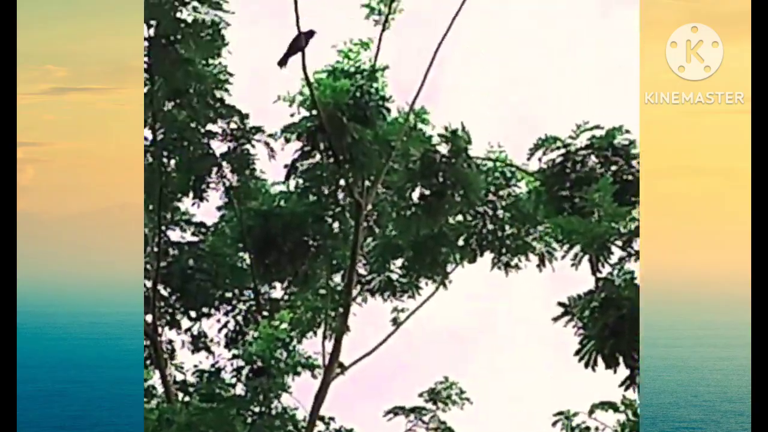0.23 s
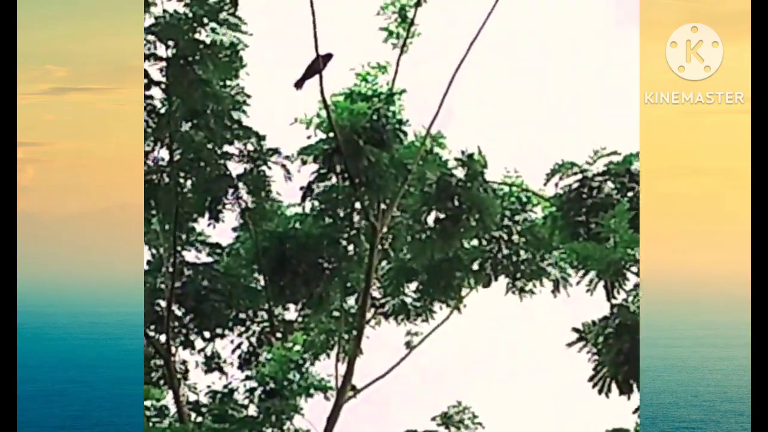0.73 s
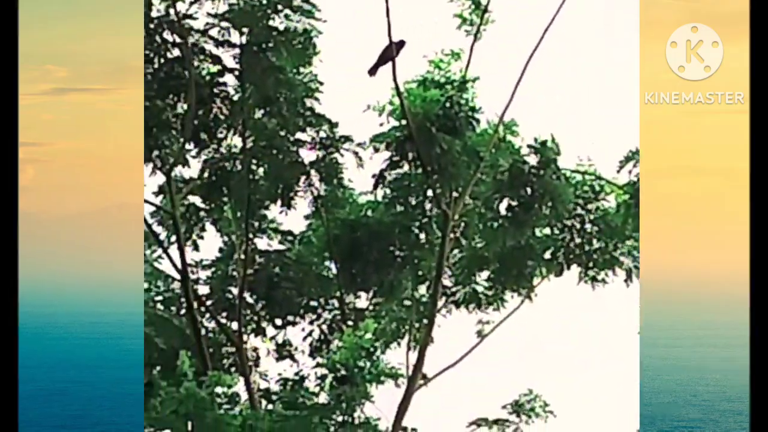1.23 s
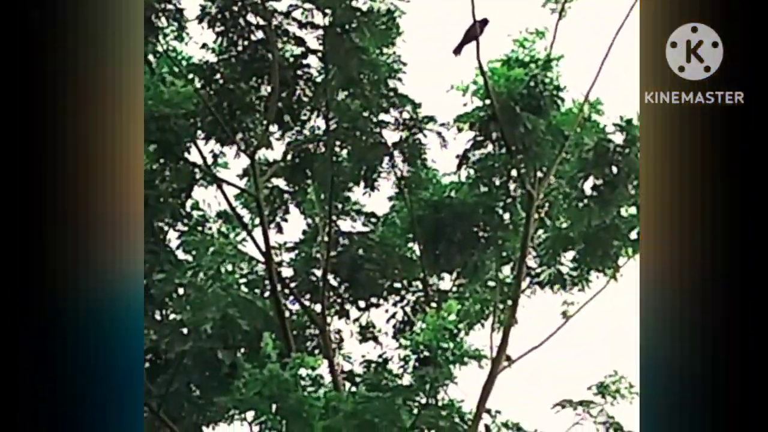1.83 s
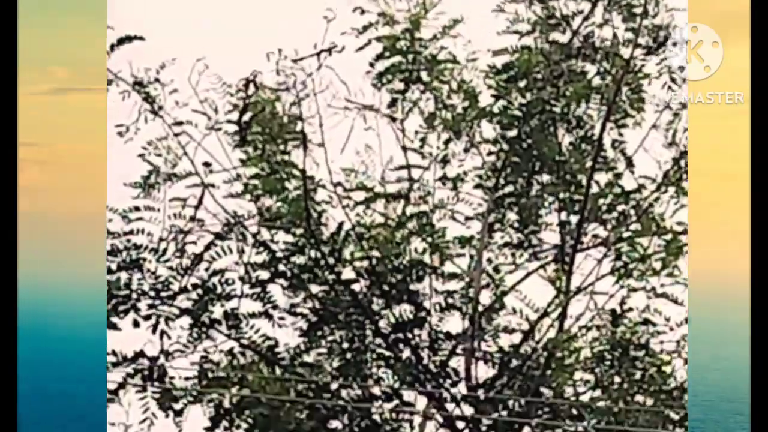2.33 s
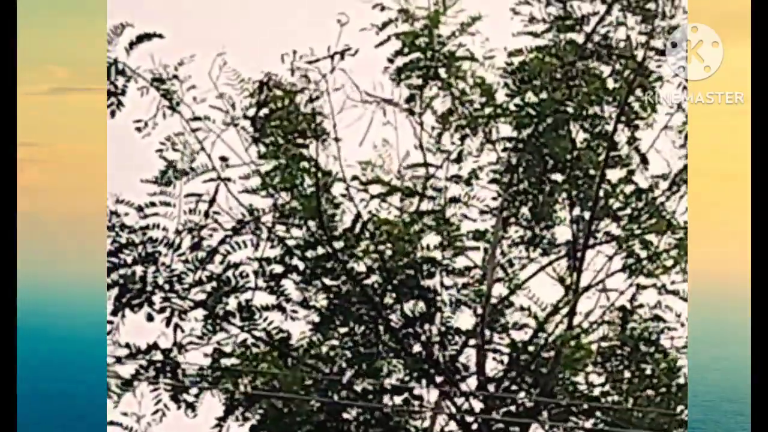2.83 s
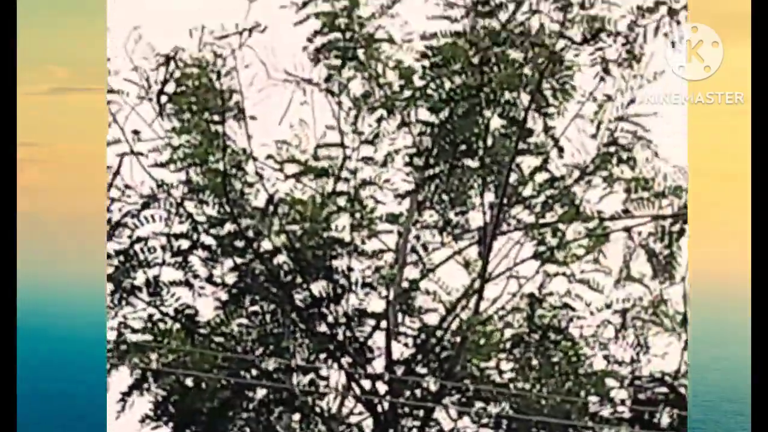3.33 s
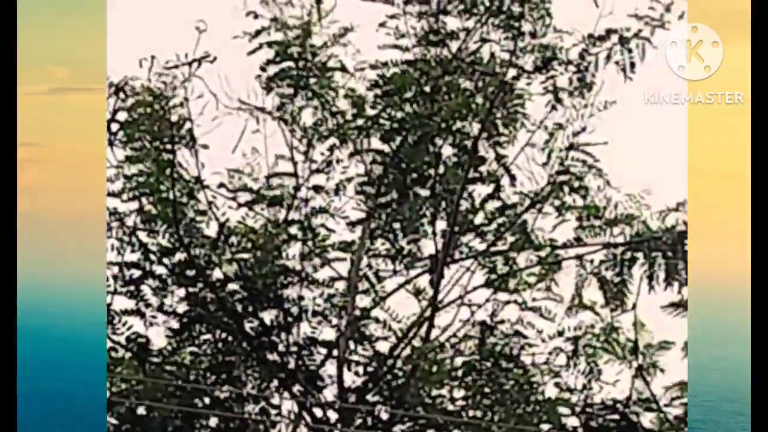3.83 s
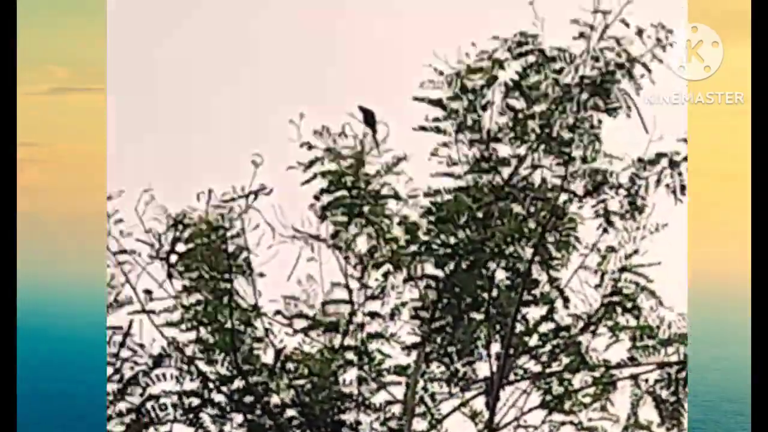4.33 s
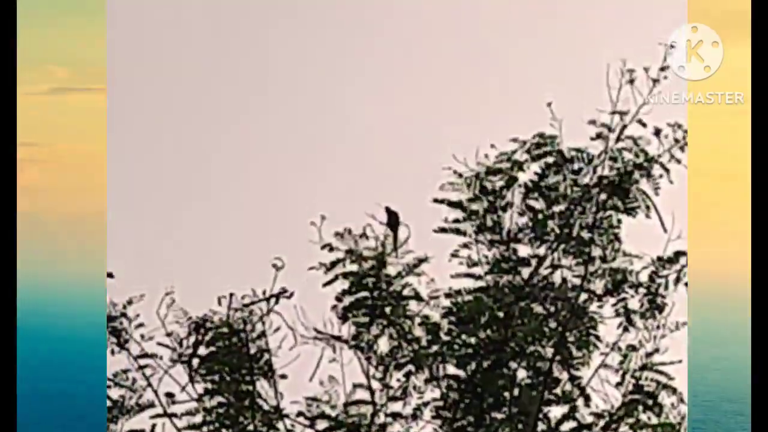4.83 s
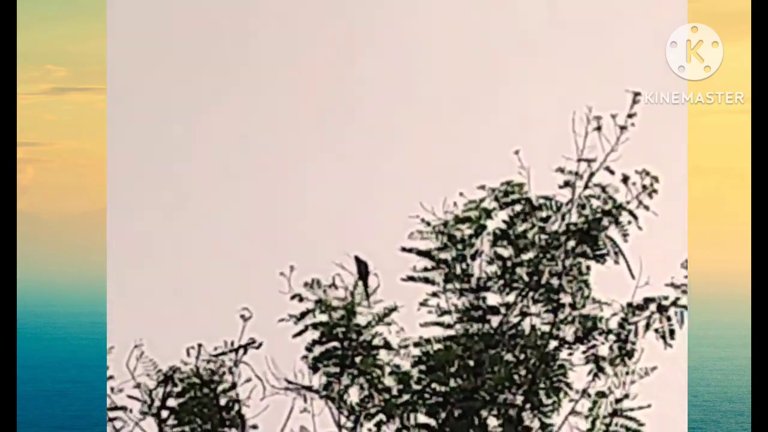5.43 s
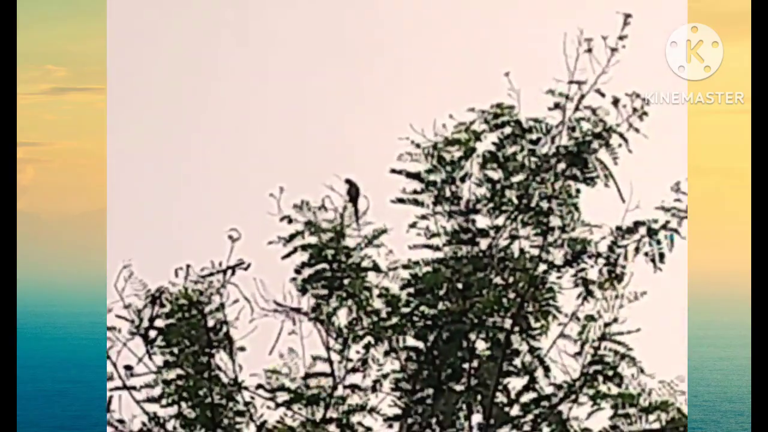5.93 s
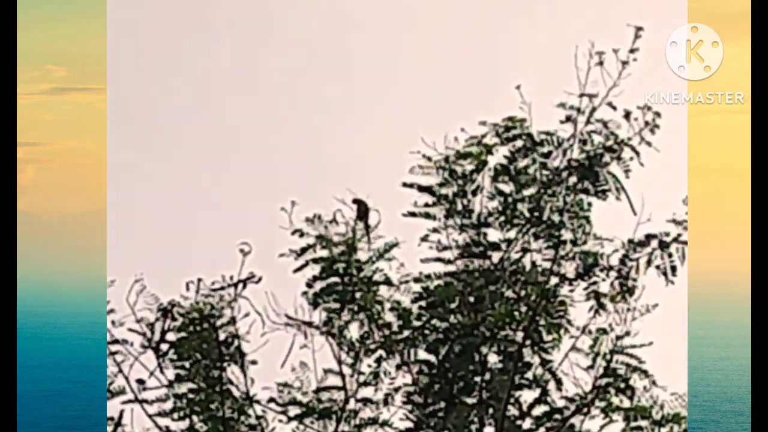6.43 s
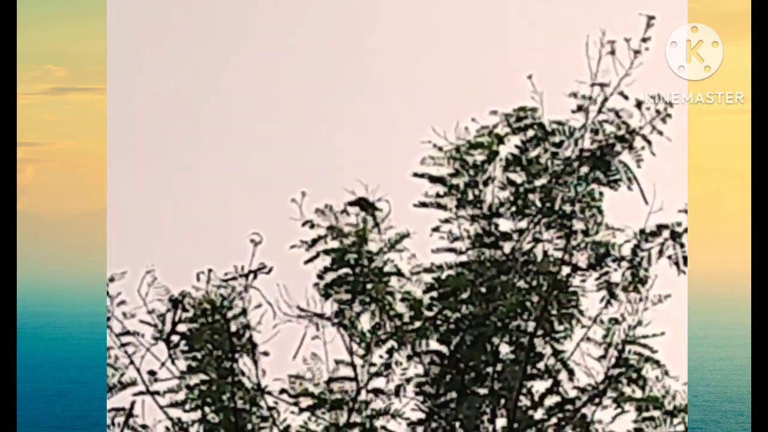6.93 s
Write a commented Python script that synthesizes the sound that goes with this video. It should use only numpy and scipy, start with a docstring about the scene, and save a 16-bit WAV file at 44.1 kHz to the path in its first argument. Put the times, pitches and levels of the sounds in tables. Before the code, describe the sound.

Two clear, echoing koel whistles, then a sudden change to quieter outdoor air where twigs click, a small bird chirps and another squeals five times.

```python
"""Insect buzz and a far engine drone open the scene; a koel whistles twice as a near-sine with side lines,
and stray bird notes glide as wavering sines. A hard cut leads to a quieter spot: another engine hums far off in low
sines, twigs tick as short rings, a small bird repeats a rising phrase, something hollow rustles in noise puffs,
a nearer bird squeals five times in hoarse harmonics and far birds chip. Echoes and diffuse tails surround the birds."""
import sys
import numpy as np
from scipy import signal
from scipy.fft import rfft, irfft
from scipy.io import wavfile
from scipy.ndimage import uniform_filter1d

SR = 44100
rng = np.random.default_rng(int(sys.argv[2]) if len(sys.argv) > 2 else 0)


def log_audio(samples):
    """Write samples as a 16-bit WAV file to the path given in sys.argv[1]."""
    # one column per channel
    frames = np.atleast_2d(samples).T
    # limit to full scale, then quantise
    limited = np.clip(frames, -1, 1)
    pcm = np.round(limited * 32767).astype(np.int16)
    wavfile.write(sys.argv[1], SR, pcm)


N = 316638
T = np.arange(N) / SR
CUT_S = 2.418   # hard cut to the second place

# Insect buzzes. Each row: start in seconds, length in seconds, level in dB halfway through.
BUZZES = [(-.03, 0.45, -45), (0.587, 0.52, -47), (1.179, 0.59, -46), (1.744, 0.76, -48), (2.422, 0.14, -53),
          (2.643, 0.33, -60), (2.98, 0.31, -61)]
BUZZ_FROM_HZ, BUZZ_TO_HZ, BUZZ_RISE_S = 4600, 5260, 0.1
BUZZ_HALF_WIDTH_HZ, TRILL_HZ, TRILL_DEPTH = 250, 58, 0.6
BUZZ_ATTACK_S, BUZZ_RELEASE_S, BUZZ_SWELL_DB_PER_S, BUZZ_REST_DB = 0.043, 0.25, 15, -89

# Colour of the air in the first place. Each row: frequency in Hz, relative dB per Hz.
AIR_1 = [(12, -76), (20, -11), (49, -12.5), (115, -1), (289, -16.5), (439, -13.5), (541, -29), (667, -24),
         (1350, -22), (1580, -26.5), (2900, -24), (3900, -29), (7200, -31), (8300, -39.5), (10300, -38),
         (10900, -77), (22000, -120)]
# Colour of the background noise in the second place, with a narrow dip near 8.2 kHz that is no part of the air.
# Each row: frequency in Hz, relative dB per Hz.
BACKGROUND_2 = [(12, -37), (20, -8), (139, 1.5), (474, -13), (937, -12), (1580, -20), (2000, -18),
                (3120, -23.5), (4050, -15), (4500, -18), (5130, -11.5), (7400, -27.5), (8220, -41),
                (9120, -29), (10400, -42.5), (13500, -111), (22000, -120)]
AIR_1_DB, BACKGROUND_2_DB = -43.5, -50   # before the swell
# Slow swell of the air. Each row: time in seconds, gain in dB.
AIR_SWELL = [(0, -0.5), (1, 0.5), (1.7, -0.5), (1.85, -1.5), (2.41, 0.5), (2.42, 1), (3.3, 1), (4.2, 2.5),
             (7.18, 2)]
# Likeness of the air on the two sides. Each row: frequency in Hz, left-right likeness (1 is the same).
AIR_LIKENESS = [(25, 0.43), (60, 0.92), (125, 0.88), (300, 0.84), (700, 0.58), (1500, 0.11), (5000, 0),
                (15000, .0)]
# Lean of the air to one side. Each row: frequency in Hz, left-right difference in dB.
AIR_LEAN = [(60, -1), (180, -1), (550, 0.5), (1650, -6), (4970, 0), (15000, -2.5)]

IDLE_HZ = 22.49   # firing rate of the idling engine in the first place
# Idling engine. Each row: multiple of the firing rate, level in dB rms before its waver.
IDLE_ORDERS = [(4, -62), (5, -45), (6, -53.5), (7, -56), (8, -58.5), (10, -62), (11, -61)]
# Speed of the far engine in the second place. Each row: time in seconds, firing rate in Hz.
ENGINE_SPEED = [(2.4, 29), (2.9, 30), (4.2, 30), (4.8, 24.5), (5.6, 25), (6.1, 31.5), (6.5, 30.5), (7, 27)]
# Far engine. Each row: multiple of the firing rate, level in dB rms before its waver.
ENGINE_ORDERS = [(3, -71.5), (4, -58.5), (5, -58), (7, -71), (8, -71)]

# Koel, one table a call; the direction shifts as echoes meet the gliding note.
# Each row: time in seconds, level in dB, left-right difference in dB, lag of the right side in ms.
KOEL_CALLS = [
    [(0.203, -61, -11, 0.05), (0.228, -30, 5, 0.24), (0.26, -25.5, 0, 0.27), (0.288, -29, -10.5, 0.21),
     (0.31, -29.5, -7, 0.68), (0.345, -32, -7, 0.25), (0.39, -23.5, -6, 0.24), (0.43, -27, 8.5, 0.27),
     (0.447, -28.5, -6, 0.36), (0.468, -24, -6, 0.044), (0.5, -23, -7.5, 0.08), (0.53, -29.5, -10, 0.089),
     (0.55, -28.5, 0, 0.28), (0.58, -35.5, -8, 0.33), (0.612, -38, -11, 0.049), (0.653, -54, 15, 0.14)],
    [(1.96, -58, -32, 0.24), (1.982, -30.5, 3, 0.25), (2.012, -24.5, 0, 0.25), (2.045, -35, -8, 0.21),
     (2.075, -34, -7, 0.3), (2.11, -38.5, 3, 0.083), (2.145, -32, -9, 0.14), (2.185, -24.4, -1, 0.29),
     (2.207, -28.5, 0.3, 0.56), (2.238, -24.5, -4.5, 0.13), (2.28, -27, -5, 0.1),
     (2.303, -27.5, -0.4, 0.34), (2.335, -37.5, -13, 0.42), (2.375, -40.5, -9, 0.031),
     (2.41, -45, -5.5, 0.14)],
]
# The koel's tune, the same in each call. Each row: offset in seconds, pitch in Hz.
KOEL_TUNE = [(0, 850), (.012, 1120), (.03, 1258), (.135, 1186), (.2, 1228), (.275, 1328), (.32, 1330),
             (.36, 1265), (.43, 890), (.45, 860)]
# Koel partials at harmonic x pitch + side x flutter. Each row: harmonic number, side number.
KOEL_PARTIALS = [(1, 0), (1, -1), (1, 1), (2, 0), (2, -1), (3, 0), (4, 1), (5, 0), (5, -1), (5, 1), (6, 0),
                 (6, -1), (8, 0), (8, 1), (9, 0), (10, 0), (11, 0)]
# Level of each partial in dB, in the same order, before throat and strain.
KOEL_PARTIAL_DB = [5, -30, -28, -23, -29, -27, -23, -20, -29, -28, -29, -36, -32, -44, -40, -33, -38]
# Throat of the koel, a wide dip. Each row: frequency in Hz, gain in dB.
KOEL_THROAT = [(500, -3.5), (2800, -0.5), (3300, -14), (4650, -22), (5100, -7), (5700, 3), (16000, -9)]
# Colour of the koel's breath. Each row: frequency in Hz, relative dB per Hz.
KOEL_BREATH = [(300, -41), (1500, 16.5), (2400, 13.5), (3500, 5), (5000, 14), (6500, -76), (8200, 9.5),
               (9200, -1), (10500, 11.5), (11500, -10), (14000, -6), (16000, -45)]
FLUTTER_HZ, FLUTTER_RISE = 335, 0.68   # second syrinx oscillation at 1195 Hz of pitch; Hz per Hz of pitch
CLEAR_AT_DB, STRAINED_AT_DB = 7, -47.5   # strain is 0 and 1 at these levels: purest when loud
OCTAVE_LIFT = 1.5   # the octave follows strain more than the side lines do
# Echoes of the koel off walls. Each row: delay in seconds, left level in dB, right level in dB.
KOEL_ECHOES = [(.07, -19, -17), (.112, -20, -20)]
ECHO_SMEAR_S = 0.02   # foliage spreads each echo

# Single whistles of other birds.
# Each row: start in seconds, length in seconds, first pitch in Hz, last pitch in Hz, level in dB.
WHISTLES = [(0.67, 0.1, 2320, 1700, -65), (0.72, 0.14, 5200, 3600, -49.5), (1.217, 0.028, 3700, 4100, -45),
            (1.243, 0.023, 4300, 4000, -42.5), (1.27, 0.026, 2850, 2700, -51),
            (1.399, .07, 2800, 2700, -54), (2.34, 0.074, 590, 660, -45.5), (3.09, 0.115, 6500, 7100, -55),
            (2.845, 0.015, 3650, 3650, -57), (2.62, 0.61, 2200, 1740, -63), (3.417, 0.22, 1960, 1980, -63),
            (4.04, 0.33, 1900, 2160, -64), (4.272, 0.19, 4050, 3400, -49.5), (5.822, 0.31, 1900, 1740, -61),
            (6.053, 0.067, 3170, 3800, -54), (6.15, 0.067, 1840, 1800, -56), (6.271, 0.11, 4000, 4070, -56),
            (6.119, 0.023, 4600, 4000, -48.5), (6.4, 0.26, 1780, 2000, -59.5),
            (6.56, 0.066, 5000, 5300, -49), (6.47, 0.028, 4720, 4600, -55), (6.505, 0.041, 4320, 3820, -53),
            (6.523, 0.12, 3320, 3330, -53.5), (6.762, 0.032, 4200, 4180, -53.5),
            (6.762, 0.042, 1950, 1950, -53.5), (5.4, 0.1, 1850, 1850, -53), (6.784, 0.02, 4200, 3200, -51),
            (6.915, 0.028, 4250, 4000, -63.5), (6.77, 0.076, 3350, 2650, -52),
            (6.858, 0.14, 3185, 2930, -55), (6.84, 0.15, 2110, 1900, -62), (6.839, 0.14, 2570, 2780, -55.5),
            (7.008, 0.043, 3950, 3300, -48), (7.049, 0.0344, 3260, 2400, -45),
            (7.068, 0.15, 2800, 2640, -49.5), (7.033, 0.15, 2100, 1920, -58),
            (7.085, 0.039, 3650, 3270, -50), (5.96, .04, 3950, 4000, -46.5)]

# Twig ticks. Each row: start in seconds, ring drive in dB, ring pitch in Hz, crack drive in dB.
TICKS = [(2.483, -51, 2240, -48.5), (2.5072, -34, 4470, -82), (2.813, -32, 2430, -57),
         (2.83, -29, 2460, -59), (2.848, -28, 2300, -70), (2.9066, -22, 2800, -59),
         (2.9112, -23, 2750, -55), (2.9936, -32, 2900, -74), (3.005, -19, 2720, -74),
         (3.0114, -24, 3100, -58), (3.025, -33, 3000, -46), (3.039, -33, 2300, -40),
         (3.0612, -27, 2900, -56), (3.0702, -26, 2860, -70), (3.1035, -25, 2850, -68),
         (3.1757, -32, 2800, -75), (3.199, -30, 2950, -76), (3.207, -27, 3000, -76),
         (3.2308, -29, 1800, -74), (3.312, -28, 2270, -70), (3.357, -30, 2350, -69),
         (3.731, -39, 4590, -54), (3.755, -28, 2600, -64.5), (3.765, -39, 2550, -70),
         (3.7753, -42, 4070, -56), (3.8294, -32, 4790, -61)]
TICK_PAN_DB = -17   # left against right

# The small bird's phrase.
# Each row: offset in seconds, length in seconds, first pitch in Hz, last pitch in Hz, dB before the gain below.
PHRASE = [(0, .03, 3480, 3480, -66), (.022, .022, 3500, 3450, -59), (.038, .028, 3350, 2800, -63),
          (.043, .018, 4150, 3980, -58), (.061, .018, 4300, 3950, -52), (.085, .014, 4620, 4550, -55),
          (.104, .016, 4800, 4550, -51), (.112, .019, 4900, 5450, -57), (.127, .009, 5350, 6400, -54),
          (.132, .015, 6250, 6800, -55)]
# Each time it sings. Each row: start in seconds, gain in dB.
SUNG = [(3.342, 11.5), (3.628, 12), (3.909, 12.5), (4.178, 11.5)]
WALL_ECHO_S, WALL_THIN_HZ = 0.086, 5200   # a flat wall returns the small bird sharp and thin
# Level of that wall echo. Each row holds one side, left then right: level in dB.
WALL_ECHO_DB = [
    [-5],
    [-9],
]

# Knocks on the microphone. Each row: time in seconds, push in dB, width in seconds, left-right difference in dB.
KNOCKS = [(3.385, -29, 0.0027, -34), (5.692, -45, 0.0064, -14), (6.52, -41, 0.0041, -21)]

# Dull rustles at set times. Each row: start in seconds, level in dB before the envelope.
RUSTLES = [(3.455, -42), (3.707, -43.5), (4.036, -43), (4.099, -37), (4.263, -38), (4.791, -42.5),
           (4.864, -39.5), (4.972, -34.5), (5.266, -41), (5.427, -46), (5.541, -39), (5.812, -43),
           (5.87, -39.5), (5.934, -39), (5.993, -41.5), (6.182, -38), (6.233, -35.5), (6.396, -41.5),
           (6.509, -43), (6.89, -44.5)]
# Hollow body that rustles. Each row: frequency in Hz, relative dB per Hz.
RUSTLE_BODY = [(150, -4.5), (330, 3), (500, -22), (680, -0.5), (810, -16.5), (950, 2), (1120, -11.5),
               (1290, -4), (1550, -27), (4000, -57), (16000, -83)]
RUSTLE_DECAY_S = 0.019
MORE_RUSTLES_DB, MORE_SPREAD_DB, MORE_FROM_S = -43, -2.5, 4.6   # sixteen more come at random

# Squeals rise, hold, fall to a knee and slide out.
# Each row: start in seconds, rise in seconds, hold in seconds, fall in seconds, slide in seconds, top in Hz,
# knee in Hz, base level in dB, push on the rise in dB.
SQUEALS = [(4.397, 0.035, 0.055, 0.041, 0.037, 2605, 1852, -24, -7),
           (4.694, 0.033, .013, 0.046, 0.055, 2540, 1970, -24.5, 8.5),
           (5.064, 0.035, 0.0066, 0.019, 0.086, 2594, 1977, -24.5, 1.5),
           (5.364, .042, 0.0095, 0.025, .07, 2716, 2130, -24, 1),
           (5.652, 0.035, 0.0078, 0.022, 0.09, 2510, 2092, -24.5, -1)]
# Squeal at its start, mid rise, top, mid hold, end of hold, knee, late slide and end.
# Each row: dB against the base level, hoarseness from 0 to 1, brightness in dB per octave.
SQUEAL_STAGES = [(-17.5, 0.97, -18), (-9, 0.43, -4.5), (-5, 0.2, -10.5), (-8.5, 0.65, 3.5),
                 (-6.5, 0.05, -3.5), (0.5, 0.1, -3.5), (-7, 0.25, -5.5), (-7, 0.23, -5.5)]
SQUEAL_START_HZ, SQUEAL_MID_RISE_HZ, SQUEAL_LATE_HZ, SQUEAL_END_HZ = 1100, 2000, 1670, 1430
MID_RISE_SHARE = 0.62   # of the rise: the voice starts as breath and shoots up late
LATE_SHARE = 0.78   # of the slide, where the voice starts to give out
HOLD_SAG_DB_PER_S = 376   # the longer the top is held, the deeper it sags in the middle
# Throat of the squealing bird. Each row: frequency in Hz, gain in dB.
SQUEAL_THROAT = [(1500, -33), (2000, -15), (2600, -5), (3000, -3), (3800, 3), (4400, -0.5), (5100, -5.5),
                 (5900, -7), (6500, -22), (7800, -24), (9500, -6), (11500, -29.5), (13000, -33),
                 (16000, -21)]
BREATH_CUT_HZ = 5500   # squeal breath is dull
# A second voice breaks into the first squeal.
# Each row: start in seconds, length in seconds, first pitch in Hz, last pitch in Hz, level in dB.
SECOND_VOICE = [(4.438, 0.056, 3650, 3230, -26)]
# Echo of the squeals. Each row: delay in seconds, left level in dB, right level in dB.
SQUEAL_ECHOES = [(.085, -15, -15)]
SHADOW_HZ = 6500   # the left side is turned away from the squealing bird

# A far bird's two falling chips.
# Each row: offset in seconds, length in seconds, first pitch in Hz, last pitch in Hz, dB before the gain below.
CHIPS = [(0, 0.031, 6760, 5720, -57), (.168, 0.03, 4280, 3980, -58)]
# Each time the chips come. Each row: start in seconds, gain in dB.
CHIPPED = [(5.91, 2.4), (6.177, 1), (6.447, 0.8), (6.717, 1.03), (6.999, 0)]

FAINT_HISS_DB, CUTOFF_HZ = -83, 15950   # the recorder's own hiss, added ahead of the top cut


def amp(db):
    """dB to gain."""
    return 10 ** (np.asarray(db) / 20)


def rms_one(x):
    """Scale to rms 1."""
    return x / np.sqrt(np.mean(x ** 2) + 1e-20)


def in_time(rows):
    """Columns of a curve at every sample."""
    s, *columns = np.transpose(rows)
    return [np.interp(T, s, c) for c in columns]


def at_hz(points, hz):
    """A spectrum read on a log-frequency axis."""
    point_hz, value = np.array(points).T
    return np.interp(np.log(hz), np.log(point_hz), value)


def shaped(x, spectrum):
    """Colour x by a spectrum."""
    hz = np.maximum(np.fft.rfftfreq(x.shape[-1], 1 / SR), 1)
    return irfft(rfft(x) * amp(at_hz(spectrum, hz)), x.shape[-1])


def lowpass(x, hz, order):
    """Roll off the treble above hz."""
    return signal.lfilter(*signal.butter(order, hz, fs=SR), x)


def cycles_to_phase(hz):
    """Running phase in radians of a pitch that may glide."""
    return 2 * np.pi * np.cumsum(hz, axis=-1) / SR


def drift(rate_hz, size=N):
    """Slow random wander of rms 1: noise through a double one-pole smoother."""
    r = np.exp(-2 * np.pi * rate_hz / SR)
    settle = SR // 2
    noise = rng.standard_normal(size + settle)
    return rms_one(signal.lfilter([1], [1, -2 * r, r * r], noise)[settle:])


def one_call(rows, fade_s=0.012):
    """Start sample, soft start and end, and columns of a call."""
    s, *columns = np.transpose(rows)
    start = round(s[0] * SR)
    t = np.arange(start, round(s[-1] * SR)) / SR
    fade = np.clip(np.minimum(t - s[0], s[-1] - t) / fade_s, 0, 1)
    return start, fade, [np.interp(t, s, c) for c in columns]


def place(x, pan_db, lag_s):
    """Place a sound by left-right level difference and by how much later the right side hears it."""
    left = np.interp(T + lag_s / 2, T, x) * amp(pan_db / 2)
    right = np.interp(T - lag_s / 2, T, x) * amp(-pan_db / 2)
    return np.array([left, right])


def narrow_noise(hz, half_width_hz):
    """Noise in a steep band round a moving centre, made by lifting low noise onto a carrier; rms 1."""
    phase = cycles_to_phase(hz)
    low_noise = rng.standard_normal((2, N + SR))
    steep = signal.butter(3, half_width_hz, fs=SR, output="sos")
    a, b = signal.sosfilt(steep, low_noise)[:, SR:]
    return rms_one(a * np.cos(phase) + b * np.sin(phase))


def insects():
    """A band of buzz that swells and rises, throbbing fast; a faint rest stays beneath until the last buzz ends."""
    hz = np.full(N, BUZZ_FROM_HZ, float)
    last_end_s = sum(BUZZES[-1][:2])
    level = amp(BUZZ_REST_DB) * (T < last_end_s)
    for s, length, db in BUZZES:
        age = T - s
        rising_hz = BUZZ_TO_HZ - (BUZZ_TO_HZ - BUZZ_FROM_HZ) * np.exp(-np.clip(age, 0, 2) / BUZZ_RISE_S)
        hz = np.where(age > 0, rising_hz, hz)
        gate = np.clip(np.minimum(age / BUZZ_ATTACK_S, (length - age) / BUZZ_RELEASE_S), 0, 1)
        gate = gate * ((T < CUT_S) == (s < CUT_S))   # a buzz stays in its own place
        level = level + gate * amp(db + BUZZ_SWELL_DB_PER_S * np.clip(age - length / 2, -1, 1))
    trill_hz = TRILL_HZ * (1 + 0.042 * drift(2.1))
    throb = 1 + TRILL_DEPTH * np.sin(cycles_to_phase(trill_hz))
    return level * throb * np.array([narrow_noise(hz, BUZZ_HALF_WIDTH_HZ) for side in "LR"])


def background(spectrum, patchy_db):
    """Third-octave bands of stereo noise, each with its flicker, likeness and lean, then coloured; rms 1."""
    out = 0
    edges = 20 * 2 ** (np.arange(29) / 3)
    white = rng.standard_normal((2, 2, N))
    slow = [drift(5.7) for k in range(5)]   # neighbouring bands share a flicker
    for k, (low, high) in enumerate(zip(edges, edges[1:])):
        band = signal.butter(2, [low, high], "band", fs=SR, output="sos")
        mid, side = signal.sosfilt(band, white[k % 2])
        hz = np.sqrt(low * high)
        alike = np.clip(at_hz(AIR_LIKENESS, hz), -1, 1)
        lean_db = at_hz(AIR_LEAN, hz) / 2
        gain = amp(patchy_db * slow[k // 2 % 5]) * amp([[lean_db], [-lean_db]])
        out = out + gain * (np.sqrt(1 + alike) * mid + np.sqrt(1 - alike) * side * [[1], [-1]])
    return rms_one(shaped(out, spectrum))


def engine(hz, orders, waver):
    """Low orders of the firing rate as sines that waver in level and phase."""
    phase = cycles_to_phase(hz + 0 * T)
    out = np.zeros(N)
    for order, db in orders:
        level = amp(db) * np.sqrt(2) * (1 + waver * drift(5.2))
        out += level * np.sin(round(order) * phase + waver * drift(6.5))
    return out


def koel(rough=0.45, rough_hz=25, jitter=0.05, strain_db=12, breath_db=-22):
    """A near-sine whistle; a slower second oscillation adds side lines; strain lifts them, octave and breath."""
    out = np.zeros(N)
    for rows in KOEL_CALLS:
        at, fade, (level_db, *_) = one_call(rows)
        size = len(fade)
        strain = (CLEAR_AT_DB - level_db) / (CLEAR_AT_DB - STRAINED_AT_DB)
        lift_db = strain_db * (2 * np.clip(strain, 0, 1) - 1)
        hz = np.interp(np.arange(size) / SR, *np.transpose(KOEL_TUNE))
        hz = uniform_filter1d(hz, size=500)   # round the corners of the tune
        main = cycles_to_phase(hz)
        second = cycles_to_phase(FLUTTER_HZ + FLUTTER_RISE * (hz - 1195))
        shake = jitter * drift(120, size=size)   # the cycle shape shakes and blurs the high lines
        breath = rms_one(shaped(rng.standard_normal(size), KOEL_BREATH))
        voice = amp(breath_db + lift_db) * breath
        for (harmonic, side), db in zip(KOEL_PARTIALS, KOEL_PARTIAL_DB):
            weak = harmonic + abs(side) > 1   # all but the fundamental are unsteady
            waver = 1 + rough * weak * drift(rough_hz, size=size)
            is_octave = harmonic == 2 and side == 0
            lift = abs(side) + OCTAVE_LIFT * is_octave
            throat_db = at_hz(KOEL_THROAT, harmonic * hz + side * FLUTTER_HZ)
            gain = np.sqrt(2) * amp(db + lift_db * lift + throat_db)
            voice += gain * waver * np.sin(harmonic * main + side * second + (harmonic - 1) * shake)
        out[at:at + size] += amp(level_db) * fade * voice
    return out


def outdoors(x, echoes, t60, wet_db, near_t60, near_db, dull_hz, far_dull_hz):
    """Smeared wall echoes, quick scatter off near leaves and a long, duller tail, its own in each channel."""
    t = np.arange(2 * SR) / SR
    paths = np.zeros((2, len(t)))
    for seconds, db, hz in ((t60, wet_db, far_dull_hz), (near_t60, near_db, 18000)):
        decay = amp(-60 * t / seconds) * np.minimum(t / 0.0073, 1)
        tail = rng.standard_normal(paths.shape) * decay
        paths += amp(db) * lowpass(tail, hz, order=2) / np.sqrt(np.sum(tail[0] ** 2))
    for delay, *side_db in echoes:
        burst = rng.standard_normal(paths.shape) * np.exp(-((t - delay) / ECHO_SMEAR_S) ** 2)
        paths += amp(side_db)[:, None] * burst / np.sqrt(np.sum(burst[0] ** 2))
    paths = lowpass(paths, dull_hz, order=1)
    return signal.fftconvolve(x[None], paths, axes=1)[:, :N]


def whistles(rows, waver, waver_hz=70):
    """Gliding sines under a rounded envelope; moving air and leaves make far ones waver in level and phase."""
    out = np.zeros(N + SR)
    for s, length, from_hz, to_hz, db in rows:
        hz = np.linspace(from_hz, to_hz, round(length * SR))
        size, at = len(hz), round(s * SR)
        phase = cycles_to_phase(hz) + waver * drift(waver_hz, size=size)
        envelope = signal.windows.tukey(size, 0.6)
        level = amp(db) * envelope * (1 + waver * drift(waver_hz, size=size))
        out[at:at + size] += level * np.sin(phase)
    return out[:N]


def ticks(cycles=1.4, crack_s=0.004):
    """Twigs: a ring dying within a few cycles and a short, slightly softened crack of noise."""
    size = 800
    out, t = np.zeros((2, N)), np.arange(size) / SR
    for s, db, hz, crack_db in TICKS:
        at = round(s * SR)
        ring = amp(db) * np.sin(2 * np.pi * hz * t) * np.exp(-t * hz / cycles) * np.minimum(t * hz, 1)
        noise = rng.standard_normal(size + 1)
        crack = amp(crack_db) * (noise[1:] + 0.5 * noise[:-1])
        crack = crack * np.exp(-t / crack_s) * np.minimum(t / 0.0007, 1)
        out[:, at:at + size] += amp([[TICK_PAN_DB], [0]]) * (ring + crack)
    return out


def sing(phrase, times, waver):
    """Repeat one phrase of whistles, at a slightly different pitch each time."""
    rows = []
    for s, gain_db in times:
        tune = rng.normal(1, 0.008)
        for offset, length, from_hz, to_hz, db in phrase:
            rows.append((s + offset, length, from_hz * tune, to_hz * tune, db + gain_db))
    return whistles(rows, waver)


def wall(x):
    """One sharp echo off a flat wall, without its lows."""
    late = np.interp(T - WALL_ECHO_S, T, x, left=0)
    thin = signal.lfilter(*signal.butter(2, WALL_THIN_HZ, "high", fs=SR), late)
    return amp(WALL_ECHO_DB) * thin


def knocks(rebound=0.42):
    """A push on the membrane and a slower swing back."""
    out = np.zeros((2, N))
    for s, db, width, pan_db in KNOCKS:
        push = np.exp(-((T - s) / width) ** 2)
        swing_back = rebound * np.exp(-((T - s - 0.9 * width) / (2.0 * width)) ** 2)
        out += amp([[db + pan_db / 2], [db - pan_db / 2]]) * (push - swing_back)
    return out


def rustles(alike=0.98):
    """Short puffs of noise in one hollow body."""
    size = 5000
    out, t = np.zeros((2, N + size)), np.arange(size) / SR
    more_s = MORE_FROM_S + rng.random(size=16) * (N / SR - MORE_FROM_S)
    more_db = MORE_RUSTLES_DB + MORE_SPREAD_DB * rng.standard_normal(size=16)
    envelope = np.exp(-t / RUSTLE_DECAY_S) * np.minimum(t / 0.012, 1)
    for s, db in [*RUSTLES, *zip(more_s, more_db)]:
        at = round(s * SR)
        mid, side = rng.standard_normal((2, size))
        stereo = mid + np.sqrt(1 - alike) * side * [[1], [-1]]
        out[:, at:at + size] += amp(db) * rms_one(shaped(stereo, RUSTLE_BODY)) * envelope
    return out[:, :N]


def squeal_shape(s, rise, hold, fall, slide, top_hz, knee_hz, db, push_db):
    """Rows (seconds, pitch Hz, level dB, hoarseness, brightness) at the eight stages of a squeal."""
    steps = [0, MID_RISE_SHARE * rise, (1 - MID_RISE_SHARE) * rise, hold / 2, hold / 2, fall,
             LATE_SHARE * slide, (1 - LATE_SHARE) * slide]
    times = s + np.cumsum(steps)
    hz = [SQUEAL_START_HZ, SQUEAL_MID_RISE_HZ, top_hz, top_hz, top_hz, knee_hz, SQUEAL_LATE_HZ, SQUEAL_END_HZ]
    stage_db, hoarse, tilt_db = np.transpose(SQUEAL_STAGES)
    level_db = db + stage_db
    level_db[1] += push_db   # mid rise
    level_db[3] -= HOLD_SAG_DB_PER_S * hold   # mid hold
    return np.transpose([times, hz, level_db, hoarse, tilt_db])


def squeals(hoarse_hz=500, jitter=0.6, breath=0.35, tremble_hz=120, grain=0.25):
    """Harmonics slide through fixed throat resonances; hoarseness shakes the cycle and adds breath."""
    out = np.zeros(N)
    orders = np.arange(1, 9)[:, None]
    for squeal in SQUEALS:
        at, fade, (hz, level_db, hoarse, tilt_db) = one_call(squeal_shape(*squeal))
        size = len(hz)
        hoarse = np.clip(hoarse, 0, 1)
        unsteady = hoarse + grain * np.where(orders > 3, 1, 0.35)   # the high harmonics are never clean
        phase = cycles_to_phase(hz) + jitter * unsteady * drift(hoarse_hz, size=size)
        gains = amp(at_hz(SQUEAL_THROAT, orders * hz) + tilt_db * np.log2(orders))
        gains = gains * (orders * hz < SR / 2.2)
        gains /= np.sqrt(np.sum(gains ** 2, axis=0) / 2)   # throat and tilt set colour, not loudness
        tremble = np.array([drift(tremble_hz, size=size) for k in orders])
        waver = 1 + unsteady * np.sqrt(orders) * tremble
        voice = np.sum(gains * waver * np.sin(orders * phase), axis=0)
        breath_noise = shaped(rng.standard_normal(size), SQUEAL_THROAT)
        voice += breath * hoarse * rms_one(lowpass(breath_noise, BREATH_CUT_HZ, order=2))
        out[at:at + size] += amp(level_db) * fade * voice
    return out


def first_place():
    """Air, idling engine, koel and stray whistles with their surroundings."""
    swell_db = in_time(AIR_SWELL)[0]
    out = amp(AIR_1_DB + swell_db) * background(AIR_1, patchy_db=-0.07)
    out = out + place(engine(IDLE_HZ, IDLE_ORDERS, waver=0.52), -0.52, 0.00026)
    call = koel()
    lean_db, lag_ms = in_time([(s, pan, lag) for rows in KOEL_CALLS for s, db, pan, lag in rows])
    out = out + place(call, lean_db, lag_ms * 1e-3)
    out = out + outdoors(call, KOEL_ECHOES, t60=1.67, wet_db=-14, near_t60=0.12, near_db=-13,
                         dull_hz=14000, far_dull_hz=8600)
    birds = whistles([row for row in WHISTLES if row[0] < CUT_S], waver=0.65)
    out = out + place(birds, -1, 0.0001)
    return out + outdoors(birds, [], t60=0.3, wet_db=-8, near_t60=0.06, near_db=-2,
                          dull_hz=10500, far_dull_hz=7000)


def second_place():
    """Background noise, far engine, small bird, whistles, squeals and chips with their surroundings."""
    swell_db = in_time(AIR_SWELL)[0]
    out = amp(BACKGROUND_2_DB + swell_db) * background(BACKGROUND_2, patchy_db=3.0)
    engine_hz = in_time(ENGINE_SPEED)[0]
    out = out + place(engine(engine_hz, ENGINE_ORDERS, waver=0.51), -1.0, 0.000081)
    birds = whistles([row for row in WHISTLES if row[0] >= CUT_S], waver=0.65)
    small = sing(PHRASE, SUNG, waver=0.3)
    near = squeals() + whistles(SECOND_VOICE, waver=0.25)
    chips = sing(CHIPS, CHIPPED, waver=0.25)
    out = out + amp(-2) * place(birds, 0, 0.00005)
    out = out + place(small, 2, -0.00002) + wall(small)
    left, right = place(near, -3.5, 0.00017)
    out = out + np.array([lowpass(left, SHADOW_HZ, order=1), right])
    out = out + outdoors(near, SQUEAL_ECHOES, t60=0.8, wet_db=-7.5, near_t60=0.04, near_db=-3,
                         dull_hz=10000, far_dull_hz=5500)
    out = out + place(chips, 4, 0)
    return out + outdoors(small + chips + amp(3) * birds, [], t60=0.7, wet_db=-6.5, near_t60=0.08, near_db=-9,
                          dull_hz=10500, far_dull_hz=7000)


def scene():
    """Two places joined by a hard cut, with insects, ticks, knocks and rustles laid over."""
    places = np.where(T < CUT_S, first_place(), second_place())
    return places + insects() + ticks() + knocks() + rustles()


def record(dry):
    """Add a faint hiss, then cut the top steeply."""
    hiss = amp(FAINT_HISS_DB) * rng.standard_normal(dry.shape)
    top_cut = signal.cheby2(12, 70, CUTOFF_HZ, fs=SR, output="sos")
    return signal.sosfilt(top_cut, dry + hiss)


dry = scene()
out = record(dry)
log_audio(out)
```